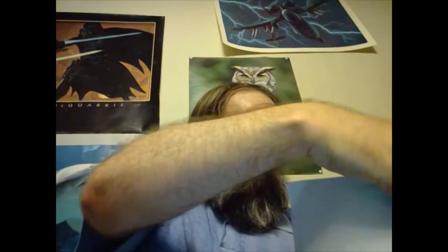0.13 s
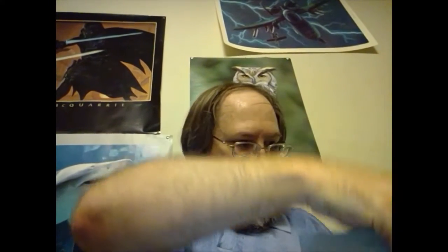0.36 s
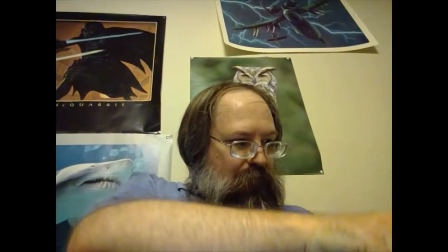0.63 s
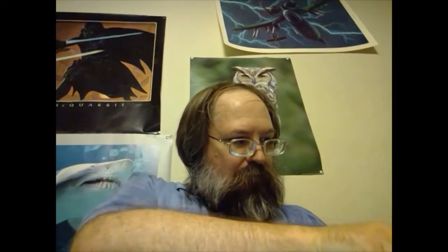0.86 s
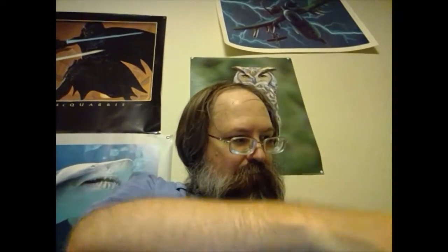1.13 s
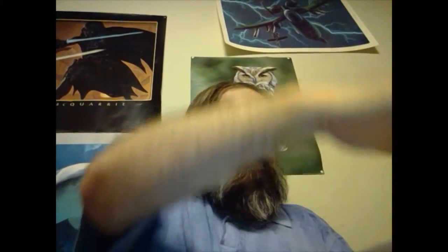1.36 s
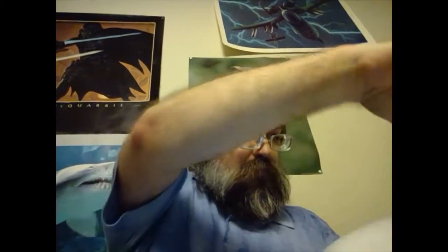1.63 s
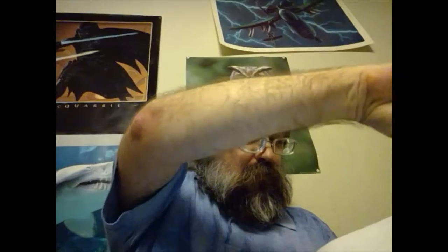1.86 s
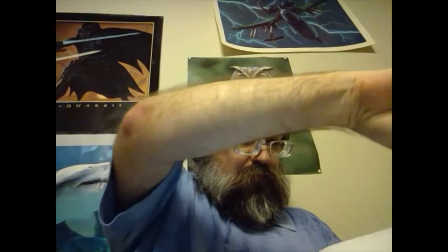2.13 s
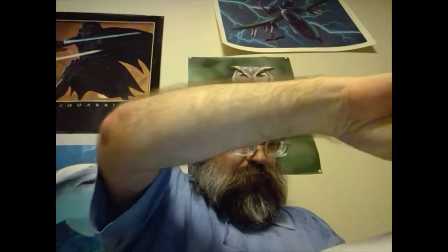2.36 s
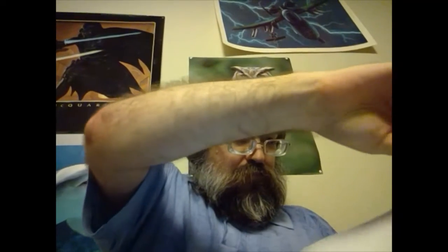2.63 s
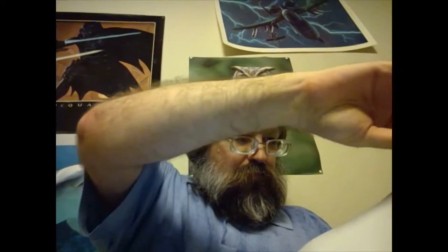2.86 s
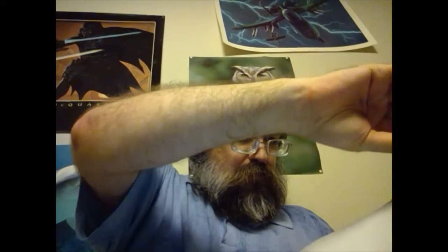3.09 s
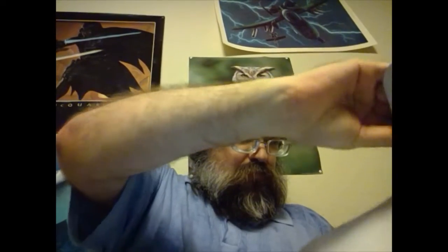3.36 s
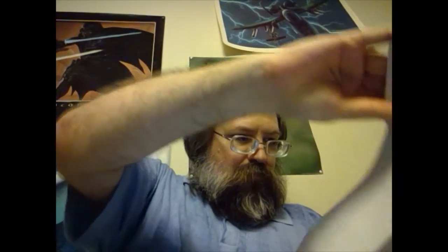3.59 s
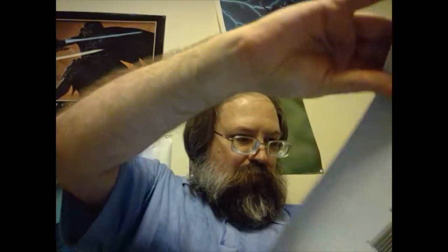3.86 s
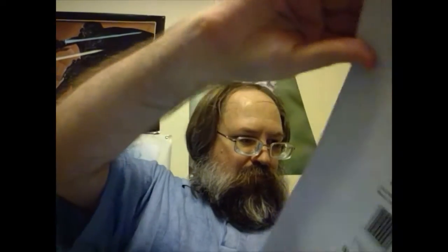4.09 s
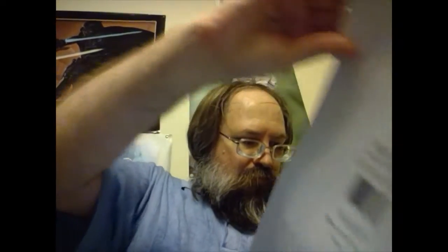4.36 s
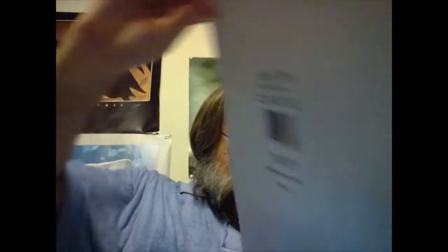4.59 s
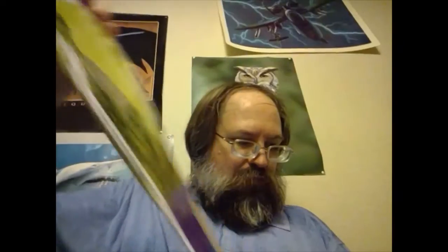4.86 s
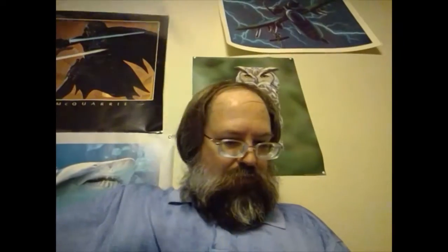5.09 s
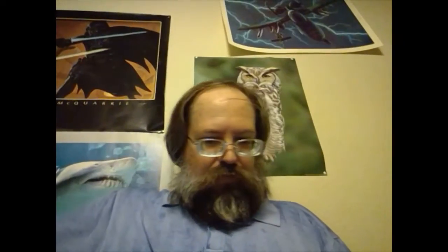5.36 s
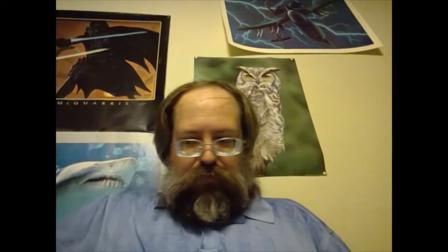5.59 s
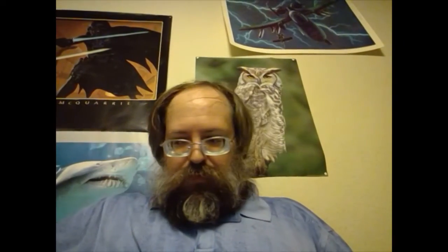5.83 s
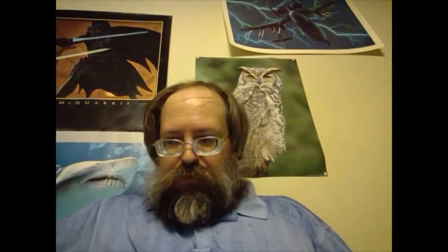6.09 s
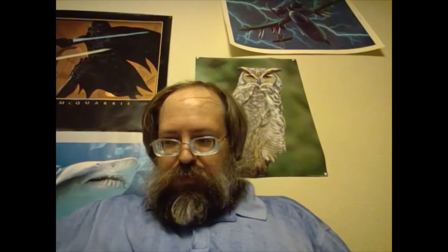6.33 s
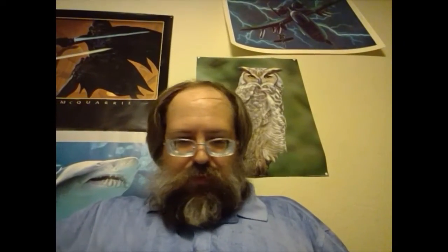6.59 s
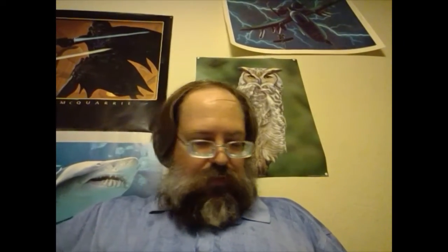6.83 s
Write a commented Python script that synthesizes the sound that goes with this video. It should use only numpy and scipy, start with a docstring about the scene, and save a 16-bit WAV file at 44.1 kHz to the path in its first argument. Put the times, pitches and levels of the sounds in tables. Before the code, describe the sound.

Close, dry crackling of a stiff plastic package bent and peeled by hand, calming, bursting loudest midway, then dwindling to tiny late snaps.

```python
"""Stiff plastic and card packaging is bent, creased and peeled apart by hand at a desk in a small room.
It starts with busy snaps, calms, is loudest from 3.3 to 4.1 s, then fades to faint rustles and late snaps.
Dents snap through and seams rip, each a burst of cracks that rings the modes (natural pitches) of the sheet.
Between them tiny creases and slips rustle in the same modes, and folds scrunch in gliding resonances.
Underneath, filtered noise makes handling rumble and a low drone, and jolts knock the desk."""
import sys
import numpy as np
from scipy import signal
from scipy.fft import rfft, irfft
from scipy.io import wavfile
from scipy.ndimage import uniform_filter1d

SR = 44100
rng = np.random.default_rng(int(sys.argv[2]) if len(sys.argv) > 2 else 0)


def natural_amplitude(level_db):
    """Convert a level in decibels to a linear amplitude factor, elementwise."""
    exponent = np.asarray(level_db, float) / 20
    return 10 ** exponent


def bounce(signal):
    """Save signal as a 16-bit WAV file at the path given by the first command-line argument."""
    frames = np.transpose(np.atleast_2d(signal))
    limited = np.clip(frames, -1, 1)
    pcm = np.round(limited * 32767).astype(np.int16)
    wavfile.write(sys.argv[1], SR, pcm)


N = 306936  # length in samples

# How the sheet likes to ring. Each row: pitch in Hz, relative strength in dB,
# time in seconds to die by 60 dB when no hand damps it.
SHEET_MODES = [(316, -12, 0.02), (365, -4.5, 0.023), (504, -3.5, 0.018), (736.5, -7, 0.031),
               (810, -9, 0.028), (1177, 5.5, 0.0068), (1490, 6.5, 0.0063), (1954, 3, 0.0089),
               (2310, 9.5, 0.0039), (3000, 12, 0.0029), (3574, 8, 0.0032), (4550, 1, 0.0037),
               (5260, -1.5, 0.0039), (6300, 2.5, 0.0011), (7260, -7.5, 0.006), (7720, -2.5, 0.00089),
               (10100, -25, 0.001), (12600, -30.5, 0.0012), (15000, -21.5, 0.0015)]
# Jolts that reach the desk. Each row: time in seconds, level in dB.
DESK_JOLTS = [(0.143, -45), (1.698, -48), (3.702, -37.5), (4.087, -22.5), (4.419, -46), (4.83, -54),
              (6.529, -57), (6.629, -46), (6.743, -57), (6.799, -53)]


def rms_one(x):
    """Scales a sound to an average (rms) level of 1."""
    return x / np.sqrt(np.mean(x ** 2) + 1e-20)


def drift(rate):
    """A random curve of spread near 1, changing about rate times a second (199 at most)."""
    knots = rng.standard_normal(int(N / SR * 200) + 9)
    return np.interp(np.arange(N) / SR * min(rate, 199), np.arange(len(knots)), knots)


def steady(x):
    """Evens the slow level to 1 and keeps the fine grain."""
    return x / np.sqrt(uniform_filter1d(x ** 2, size=12000) + 1e-20)


def ring(x, hz, t60):
    """A resonance: a unit click sets off a sine of height 1 that dies by 60 dB in t60 seconds."""
    r = natural_amplitude(-60 / (max(t60, .001) * SR))
    w = 2 * np.pi * hz / SR
    return signal.lfilter([0, np.sin(w)], [1, -2 * r * np.cos(w), r * r], x + 1e-18)


def swell(start, end, rise, fall):
    """dB under the top: a straight rise up to start, a straight fall after end; one row per event."""
    t = np.arange(0, N + 64, 64) / SR  # one point every 64 samples
    before = np.maximum(start[:, None] - t, 0)
    after = np.maximum(t - end[:, None], 0)
    return -rise * before - fall * after


def summed(rows_db, rest_db):
    """Powers of the rows and of a resting level add up to one level in dB for every sample."""
    power = (natural_amplitude(rows_db) ** 2).sum(axis=0) + natural_amplitude(rest_db) ** 2
    return np.interp(np.arange(N) / 64, np.arange(len(power)), 10 * np.log10(power))


def room(x):
    """Dense reflections from desk and walls, dying away and a little dull."""
    t60_s, first_echo_s = .15, .004
    t = np.arange(SR // 3) / SR
    echoes = rng.standard_normal(len(t)) * natural_amplitude(-60 * t / t60_s) * (t > first_echo_s)
    echoes = signal.lfilter([1], [1, -.3], echoes)  # dulls the treble
    return signal.fftconvolve(x, echoes / np.sqrt(np.sum(echoes ** 2)))[:N]


def rumble(low_db, lumpy_db):
    """Lumpy low noise from hands and arm on the desk, over a low drone in the room."""
    rumble_db, follows = -51.5, 0.3  # follows: share of the rustle's swing in dB
    drone_hz, drone_t60_s, drone_db = 65, 0.068, -60.5
    jolt_rise_db_per_s, jolt_fall_db_per_s = 409.5, 143.5
    # Tone of the rumble. Each row: frequency in Hz, relative level in dB per Hz.
    tone_rows = [(6, -8.5), (14, 5), (32, -12), (62, -11.5), (110, -14.5), (300, -27.5), (450, -50)]
    tone_hz, tone_db = np.transpose(tone_rows)
    hz = np.maximum(np.fft.rfftfreq(N, 1 / SR), 1)
    colour = natural_amplitude(np.interp(np.log(hz), np.log(tone_hz), tone_db))
    low = irfft(rfft(rng.standard_normal(N)) * colour * (hz < 450), N)
    s, db = np.transpose(DESK_JOLTS)
    jolts_db = summed(db[:, None] + swell(s, s, jolt_rise_db_per_s, jolt_fall_db_per_s), -120)
    level = natural_amplitude(rumble_db + follows * (low_db - low_db.mean())) + natural_amplitude(jolts_db)
    # noise sent twice through one narrow resonance
    drone = ring(ring(rng.standard_normal(N), drone_hz, drone_t60_s), drone_hz, drone_t60_s)
    return rms_one(low * natural_amplitude(lumpy_db * drift(36))) * level + natural_amplitude(drone_db) * rms_one(drone)


def knocks():
    """Each jolt is a soft blow on the modes of the desk."""
    # Modes of the desk. Each row: pitch in Hz, relative strength in dB, time in seconds to die by 60 dB.
    desk_modes = [(130, 10, 0.064), (193, 0, 0.062), (260, 18, 0.025)]
    s, jolt_db = np.transpose(DESK_JOLTS)
    blows = np.zeros(N)
    blows[(s * SR).astype(int)] = natural_amplitude(jolt_db)
    soft = np.exp(-2 * np.pi * 300 / SR)  # softened above 300 Hz
    blows = signal.lfilter([1 - soft], [1, -soft], blows + 1e-18)
    return sum(natural_amplitude(db) * ring(blows, hz, t60) for hz, db, t60 in desk_modes)


def handling():
    """Every stroke rises, holds with a sag and falls; levels near 600 Hz, 3.2 kHz and 9 kHz."""
    rise_db_per_s, fall_db_per_s, sag_db_per_s = 502.5, 192, 5
    steepness = [1, 1, 1.6]  # the treble rises and falls faster
    # Each stroke is one movement of the hands over the sheet. Each row: start in seconds, hold in seconds,
    # level near 3.2 kHz in dB, level near 600 Hz against it in dB, level near 9 kHz against it in dB.
    stroke_rows = [(0.0, 0.29, -43.5, -4.5, -13.5), (0.356, 0.18, -44.5, 4.5, -26),
                   (0.58, .13, -56, 8, -17), (0.758, 0.11, -61, 11, -39), (0.945, 0.23, -61.5, 5.5, -18.5),
                   (1.268, 0.46, -60.5, 2.5, -15), (1.569, 0.046, -53.5, 2.5, -22),
                   (1.684, 0.2, -51.5, 6, -20), (2.002, 0.19, -54.5, 8, -25), (2.234, 0.12, -54, 9.5, -27),
                   (2.426, 0.075, -60, 7, -45), (2.669, 0.086, -53.5, 7, -13.5),
                   (2.826, 0.82, -60.5, 4, -25.5), (3.311, 0.056, -31, -1.5, -11.5),
                   (3.386, 0.062, -45, 4.5, -31), (3.599, 0.094, -38.5, 7.5, -6),
                   (3.715, 0.47, -48.5, 3, -8.5), (4.049, 0.067, -36, -0.5, -9.5),
                   (4.164, 0.2, -53.5, 5.5, -38), (4.413, 0.029, -43.5, 1.5, -2.5),
                   (4.5, 0.36, -54, 1.5, -8.5), (4.744, 0.097, -43.5, 5.5, -8), (4.894, 0.045, -71, 3, -25),
                   (5.055, 0.08, -74, 4, -24), (5.119, 0.023, -74, 6, -26), (5.246, 0.35, -80.5, 13, -51),
                   (5.54, 0.046, -65.5, -4, -22), (5.603, 0.046, -64, -5.5, -12),
                   (5.698, 0.19, -75, 9.5, -21), (5.876, 0.17, -68, 4.5, -11.5),
                   (6.095, 0.14, -79, -3, -3.5), (6.515, 0.27, -62.5, 3.5, -12)]
    # Rustle with the hands at rest: levels near 600 Hz, 3.2 kHz and 9 kHz in dB.
    still_db = [-77, -85, -97]
    s, hold, db, body_db, treble_db = np.transpose(stroke_rows)
    shape = swell(s, s + hold, rise_db_per_s, fall_db_per_s) + swell(s, s, 0, sag_db_per_s)
    return [summed((db + more)[:, None] + shape * steep, rest)
            for more, steep, rest in zip([body_db, 0, treble_db], steepness, still_db)]


def rustle(levels, per_s, spread_db, clump_db, slide_db, patchy_db, damping):
    """Tiny creases in clumps plus sliding friction, ringing in the modes of the hand-damped sheet."""
    low_db, middle_db, high_db = levels
    effort = np.clip((middle_db + 76) / 25, .45, 1)  # gentle handling slides more than it creases
    shared = drift(110)
    # partly shared, partly own to each of four regions of modes
    clumps = [natural_amplitude(clump_db * effort * (.75 * shared + .65 * drift(110))) for _ in range(4)]
    sizes = natural_amplitude(spread_db * np.minimum(rng.exponential(1, N), 5)) * rng.choice([-1, 1], N)
    creases = rms_one(sizes * (rng.random(N) < per_s / SR))
    reach = rng.random(N)  # a crease stirs only a neighbourhood of modes
    out = np.zeros(N)
    for k, (hz, db, t60) in enumerate(SHEET_MODES):
        near = abs(reach - k / len(SHEET_MODES)) < .14
        push = creases * near * effort + natural_amplitude(slide_db) * rng.standard_normal(N)
        # the level of this mode lies between the three handling levels
        if hz < 3200:
            up = np.log(hz / 600) / np.log(3200 / 600)
            level_db = low_db + up * (middle_db - low_db)
        else:
            top = np.log(hz / 3200) / np.log(9000 / 3200)
            level_db = middle_db + min(abs(top), 1.1) ** 1.2 * (high_db - middle_db)
        # several modes share each level; those near 5 kHz stand out a little, those near 11 kHz sink
        level_db = level_db - 5.0 + 1.1 * (4000 < hz < 6000) - 5.0 * (9500 < hz < 11500)
        level = natural_amplitude(level_db + patchy_db * drift(11))
        clump = clumps[k * len(clumps) // len(SHEET_MODES)]
        out += steady(ring(push, hz, t60 * damping)) * clump * level * (-1) ** k
    return out


def scrunches():
    """Dense creases ring in three neighbouring resonances that glide as the fold closes, then stop short."""
    rise_s, stop_s, ring_cycles = 0.016, .009, 19
    creases_per_s, clump_db = 4000, 2.0
    # A fold crumpling. Each row: start in seconds, length in seconds, level in dB, first Hz, last Hz.
    scrunch_rows = [(0.028, 0.24, -44, 3570, 3330), (0.408, 0.12, -33.5, 583, 845),
                    (1.553, 0.045, -44.5, 830, 1170), (1.558, 0.047, -51, 2190, 2020),
                    (1.761, 0.089, -39, 700, 780), (3.626, .1, -38.5, 3480, 2950),
                    (4.35, 0.16, -53.5, 7600, 6700), (4.547, 0.3, -53, 6840, 6200),
                    (4.667, 0.096, -43.5, 6000, 3500), (4.809, 0.026, -37, 2200, 1740),
                    (5.24, 0.22, -65, 1003, 1434), (5.382, 0.11, -65.5, 2310, 2294),
                    (5.532, 0.0355, -54, 3220, 2160), (5.612, 0.041, -57.5, 4560, 3800),
                    (5.896, 0.044, -66.5, 2460, 3840), (6.597, 0.036, -60.5, 5500, 5820),
                    (6.652, 0.045, -58, 3000, 3800)]
    size = 12000
    out = np.zeros(N + SR)
    t = np.arange(size) / SR
    draws = rng.random((len(scrunch_rows), 3, size))
    clumps = natural_amplitude(clump_db * drift(110))
    for (s, length, db, first_hz, last_hz), (born, big, place) in zip(scrunch_rows, draws):
        creases = (born < creases_per_s / SR) * natural_amplitude(-3 * np.log(big + .01)) * np.sign(place - .5)
        along = np.clip(t / length, 0, 1)
        one = 0
        for share in np.linspace(0, 1, 4):  # the centre moves on in overlapping steps
            here = creases * np.maximum(1 - 3 * abs(along - share), 0)
            hz = first_hz * (last_hz / first_hz) ** share
            for off, sign in [(.82, -1), (1, 0.94), (1.2, -0.92)]:
                one = one + sign * ring(here, hz * off, ring_cycles / hz)
        shape = np.clip(t / rise_s, 0, 1) * np.exp(-np.maximum(t - length, 0) / stop_s)
        at = round(s * SR)
        out[at:at + size] += natural_amplitude(db) * one * shape / np.sqrt(np.mean(one ** 2))
    return out[:N] * clumps


def ticks(middle_db):
    """Rows of lesser snaps at random moments, as loud as the stroke under them allows."""
    per_s, over_rustle_db, spread_db, loudest_db = 16, 16, 4, -24
    middle_hz, pitch_spread = 1300, 2.5  # pitches reach 2.5 times up or down
    middle_treble_db = -13
    draws = rng.random((round(per_s * N / SR), 4))
    s = draws[:, 0] * (N - 1) / SR
    swing = 2 * draws[:, 1:].T - 1
    peak_db = middle_db[(s * SR).astype(int)] + over_rustle_db + spread_db * swing[0]
    peak_db = np.minimum(peak_db, loudest_db)
    return list(zip(s, peak_db, middle_hz * pitch_spread ** swing[1], middle_treble_db + 8 * swing[2]))


def snaps(table, scatter_db, own_db, own_cycles, usual_treble_db, tear_ms, first, uneven, flutter_db):
    """A dent or seam gives way in a dying burst of cracks; every mode is struck with a strength of its own."""
    s, peak_db, own_hz, treble_db = np.transpose(table)
    size = 3000
    t = np.arange(size) / SR
    draws = rng.standard_normal((len(s), size + len(SHEET_MODES)))
    tear = draws[:, :size] ** round(uneven) * np.exp(-t / tear_ms * 1000) / uneven
    # the freed sheet shivers on, more after a big dent
    shiver = draws[:, size - 1::-1] * np.exp(-t / 0.0074)
    tear += natural_amplitude(flutter_db + .2 * peak_db)[:, None] * shiver
    tear[:, 0] = first  # the opening crack is the sure one
    sound = 0
    for k, (hz, db, t60) in enumerate(SHEET_MODES):
        # a crisp snap strikes the high modes harder and the low ones softer
        crisp = np.clip(np.log2(hz / 1800) / 2, -.3, 1.3)
        strength = natural_amplitude(db + crisp * (treble_db - usual_treble_db) + scatter_db * draws[:, size + k])
        sound = sound + (-1) ** k * strength[:, None] * ring(tear, hz, t60)
    out = np.zeros(N + size)
    for row, when in enumerate(s):
        # the dent itself rings at a pitch of its own
        dent = ring(tear[row], own_hz[row], own_cycles / own_hz[row])
        one = sound[row] / abs(sound[row]).max() + natural_amplitude(own_db) * dent / abs(dent).max()
        at = round(when * SR)
        out[at:at + size] += natural_amplitude(peak_db[row]) * one / abs(one).max()
    return out[:N]


def scene():
    """The sheet snaps, rips and rustles in the room; the desk rumbles."""
    # Dents snapping through. Each row: time in seconds, peak in dB, strongest ring in Hz,
    # treble against the peak in dB.
    snap_rows = [(0.036, -12.5, 1280, -25.5), (0.133, -21, 740, -4), (0.233, -6, 1015, -14.5),
                 (0.275, -24, 830, -35), (0.341, -45, 2500, -10), (0.358, -11, 950, -22.5),
                 (0.385, -10.5, 920, -12.5), (0.419, -21, 544, -48), (0.514, -8, 774, -17),
                 (0.618, -24.5, 890, -43), (0.748, -22, 1060, -37), (0.765, -25, 2020, -33),
                 (0.983, -27, 540, -24), (1.034, -32, 1310, -31), (1.713, -22.5, 810, -36),
                 (1.753, -21, 1300, -43), (1.778, -37, 5500, -20), (1.791, -30, 930, -30),
                 (1.984, -34.5, 423, -52), (2.047, -51, 3000, -12), (2.09, -14, 3200, -12),
                 (2.142, -16.5, 1210, -6), (2.175, -24, 450, -19), (2.219, -16, 660, -21),
                 (2.249, -28, 2500, -9), (2.256, -10.5, 434, -27), (2.297, -24, 710, -29),
                 (2.304, -23, 352, -35), (2.315, -32, 347, -17), (2.329, -21.5, 392, -25),
                 (2.373, -31.5, 526, -39), (2.415, -10, 860, -11), (2.545, -39.5, 3000, -16),
                 (2.599, -38.5, 403, -24), (2.684, -19.5, 393, -14), (2.716, -16, 477, -6),
                 (2.735, -21, 860, -13), (2.769, -26, 327, -53), (3.023, -29.5, 520, -23),
                 (3.126, -25, 424, -19.5), (3.234, -23.5, 780, -31), (3.259, -21, 2030, -25.5),
                 (3.277, 0.5, 685, -18.5), (3.294, -1.5, 438, -32.5), (3.31, -11.5, 483, -20),
                 (3.343, -9, 397, -28), (3.353, -8.5, 470, -19), (3.6, -5, 750, -21),
                 (3.643, -9.5, 850, -8.5), (3.667, -22, 504, -21.5), (3.698, -12, 388, -12.5),
                 (3.712, -12.5, 720, -8.5), (3.734, -21, 1900, -1), (3.762, -25.5, 347, -5),
                 (3.809, -5, 1050, -20.5), (3.854, -40.5, 7000, 1), (3.874, -30, 3500, -3),
                 (3.921, -35, 6000, -8.5), (3.9565, -6.5, 738, -16.5), (4.026, -24, 5000, 0),
                 (4.044, -30, 700, -3.5), (4.054, -13, 497, -25), (4.068, -15, 930, -12),
                 (4.087, 1, 670, -10), (4.097, -8, 726, -18.5), (4.1, -9, 320, -33.5),
                 (4.107, -17, 457, -25.5), (4.186, -22, 790, -8), (4.388, -24, 337, -6),
                 (4.426, -20, 422, -18), (4.488, -24, 440, -11), (4.529, -28, 850, 21),
                 (4.621, -21.5, 750, 1), (4.847, -21, 747, -18), (5.052, -40.5, 765, -24.5),
                 (5.108, -47.5, 1200, -12), (5.16, -45.5, 1840, -24), (5.854, -45, 5500, 8),
                 (5.952, -41, 2000, -21), (6.007, -40, 4810, -4), (6.527, -30.5, 650, -19.5),
                 (6.628, -29, 577, -35)]
    # Rips, where a seam peels in a run of cracks. Each row: time in seconds, peak in dB,
    # strongest ring in Hz, treble against the peak in dB.
    rip_rows = [(0.017, -20.5, 716, -23), (0.439, -19, 665, -38), (1.561, -35.5, 820, -54),
                (1.689, -25, 810, -23), (1.841, -27, 730, -41), (3.33, -16, 360, -12.5),
                (3.355, 2, 1040, -20), (3.412, -17, 810, -15), (3.445, -18, 650, -41),
                (3.469, -20.5, 660, -43), (3.529, -22, 905, -28), (3.589, -21, 790, -14),
                (3.633, -13, 2580, -6), (3.652, -16.5, 785, -23), (3.679, -11.5, 473, -16),
                (4.072, -10, 855, -14), (4.09, -0.5, 820, -30), (4.124, -21.5, 866, -11),
                (4.138, -22, 472, -28), (4.411, -22.5, 800, -7.5), (4.441, -21.5, 405, -11),
                (4.674, -31.5, 446, 0), (4.736, -19.5, 430, 9), (4.78, -24.5, 500, -14),
                (4.817, -15, 760, -25), (4.834, -20, 780, -3), (4.866, -21, 3400, -10.5),
                (5.143, -44, 504, -30), (5.529, -39, 780, -42), (6.6, -36, 460, -15),
                (6.741, -34, 860, -23), (6.789, -36, 533, -31)]
    levels = handling()
    colour = dict(scatter_db=2.0, own_cycles=17.0, usual_treble_db=-16.0)
    sheet = snaps(snap_rows + ticks(levels[1]), tear_ms=1.7, first=6.5, uneven=3,
                  own_db=-5.5, flutter_db=-4.0, **colour)
    sheet = sheet + snaps(rip_rows, tear_ms=7.6, first=0.91, uneven=1.1,
                          own_db=-7.0, flutter_db=-11.5, **colour)
    # the snaps and rips carry no deep bass
    sheet = signal.sosfilt(signal.butter(2, 140, "high", fs=SR, output="sos"), sheet)
    creases = rustle(levels, per_s=500, spread_db=4.0, clump_db=4.5, slide_db=-5.5,
                     patchy_db=4.0, damping=0.55)
    creases = creases + scrunches()
    echoes = natural_amplitude(-19) * room(sheet + creases)
    desk = rumble(levels[0], lumpy_db=3.0) + knocks()
    return (sheet + echoes + creases + desk)[None]


def roll_off(x):
    """The treble ends steeply here."""
    return signal.sosfilt(signal.butter(12, 16970, fs=SR, output="sos"), x)


def record(dry):
    """Only the very loudest peaks are rounded off; the top is cut."""
    rounded = dry / (1 + (abs(dry) / .96) ** 6) ** (1 / 6)
    top_cut = signal.ellip(12, .3, 55, 15780, fs=SR, output="sos")  # low-pass at 15780 Hz
    mix = signal.sosfilt(top_cut, rounded)
    return roll_off(mix)


dry = scene()
out = record(dry)
bounce(out)
```